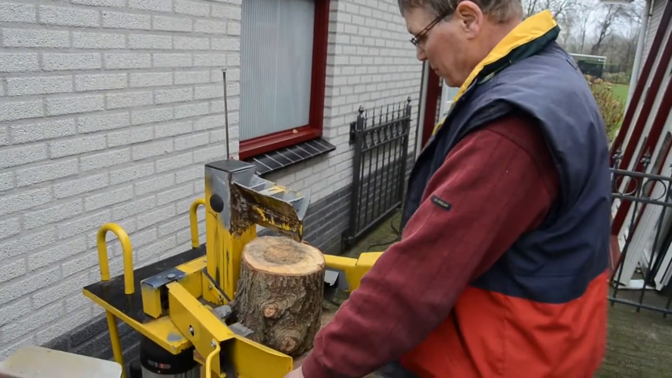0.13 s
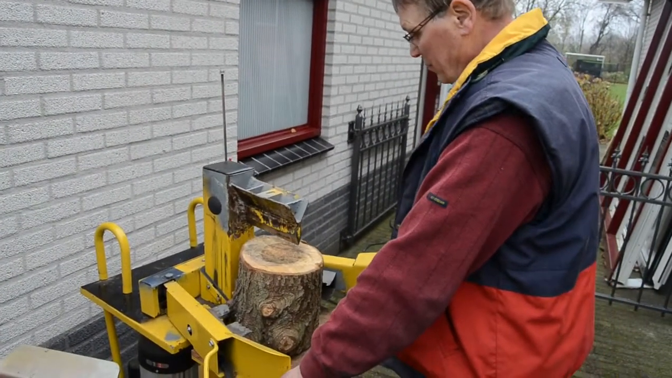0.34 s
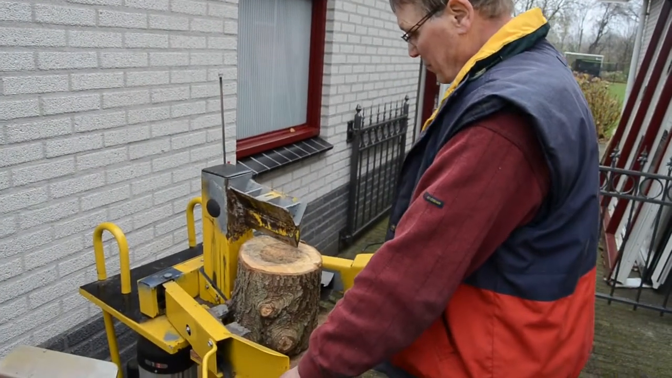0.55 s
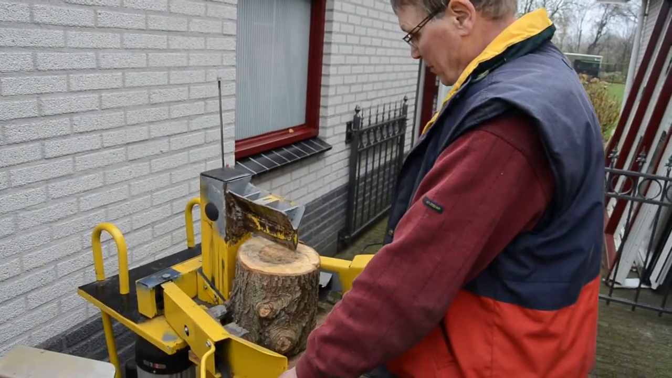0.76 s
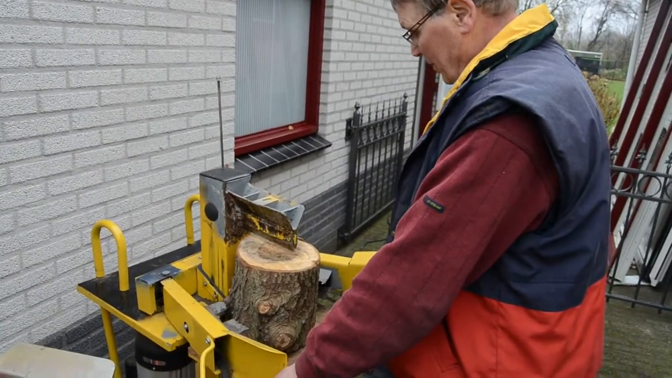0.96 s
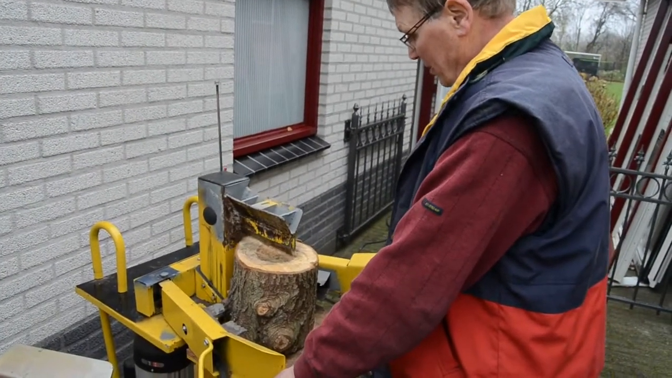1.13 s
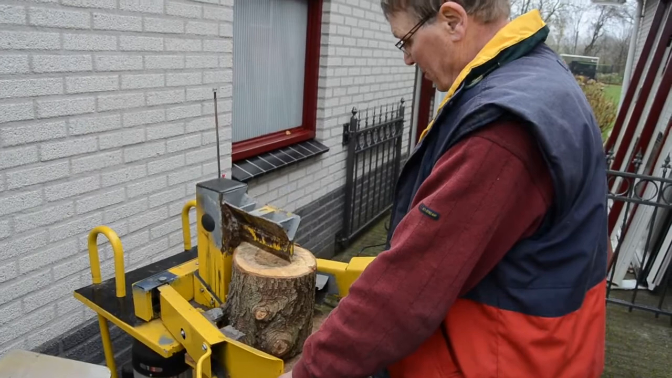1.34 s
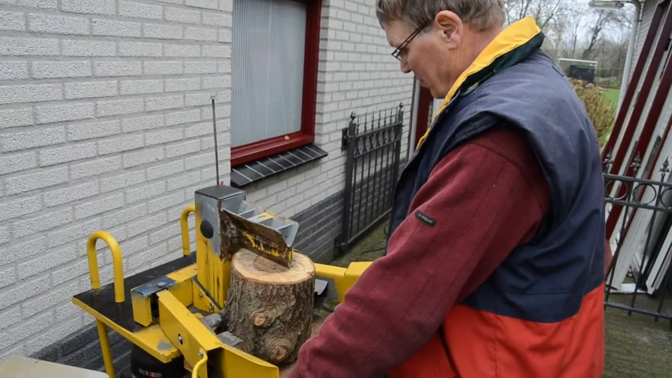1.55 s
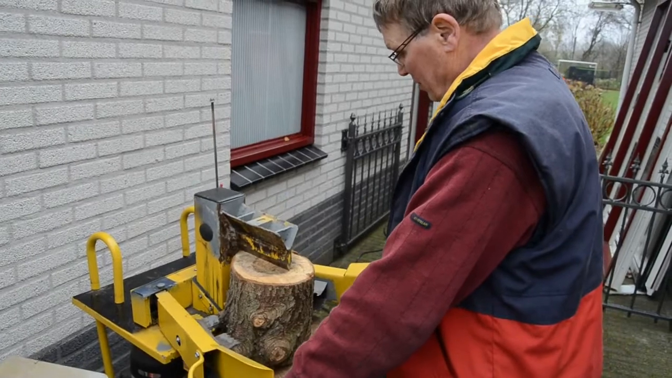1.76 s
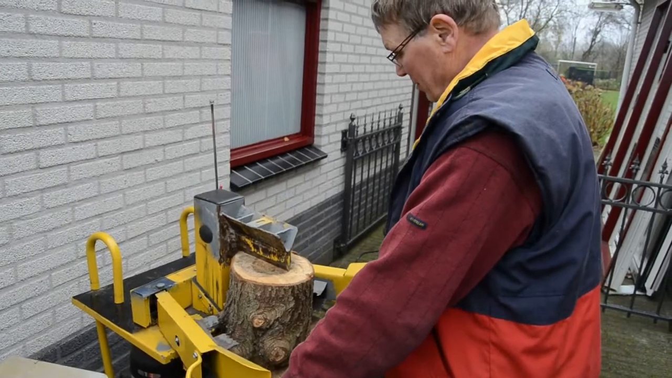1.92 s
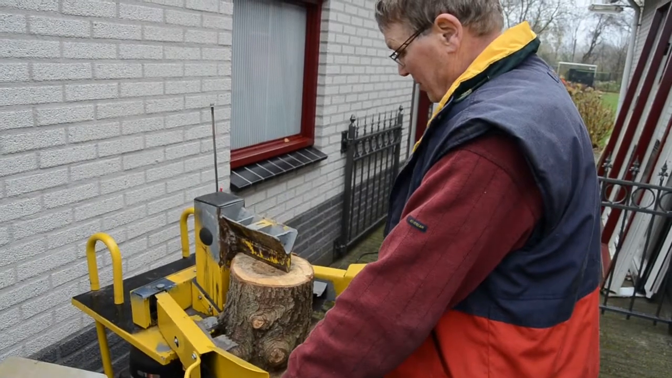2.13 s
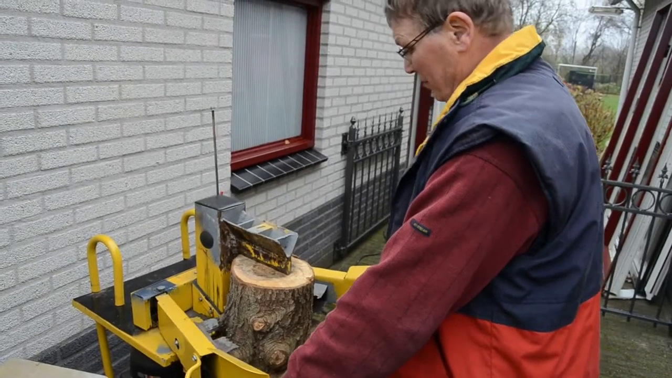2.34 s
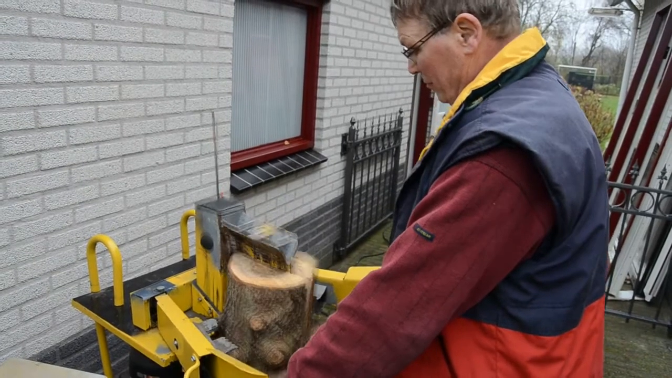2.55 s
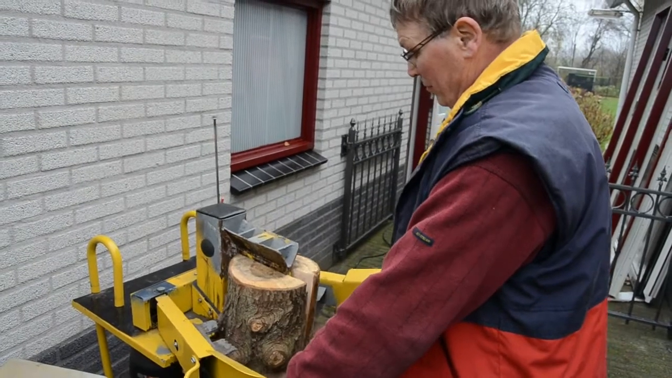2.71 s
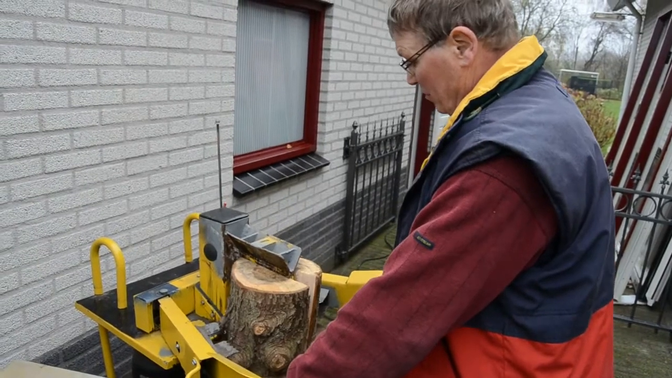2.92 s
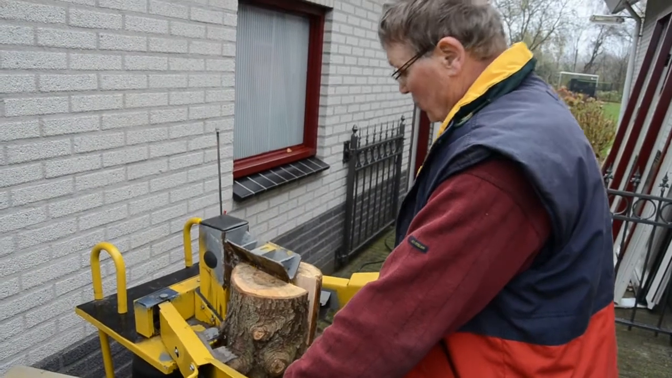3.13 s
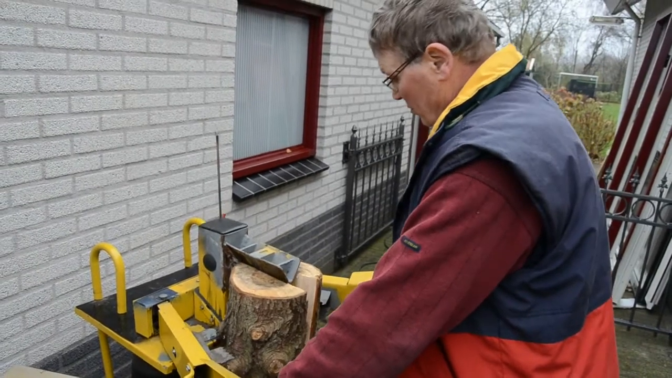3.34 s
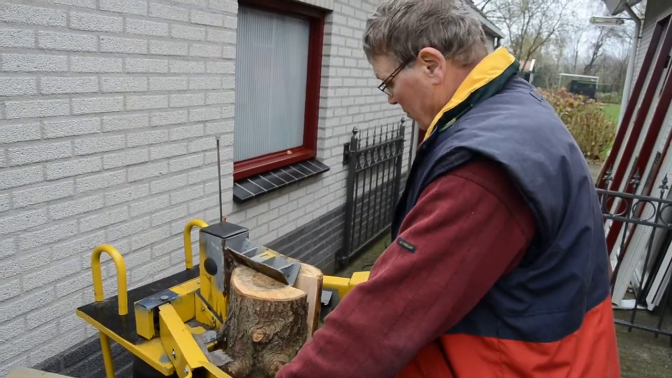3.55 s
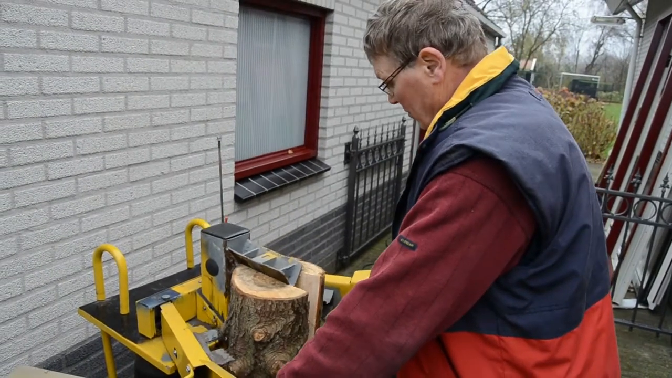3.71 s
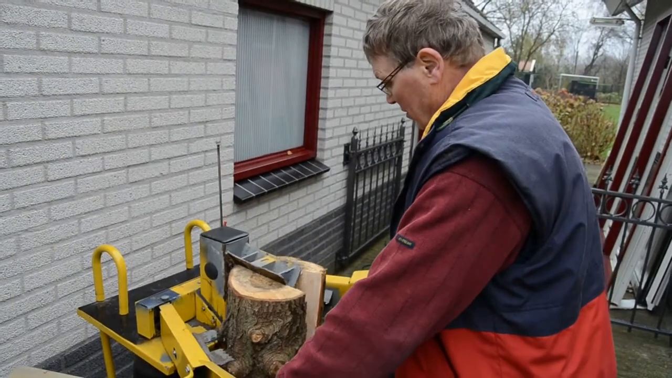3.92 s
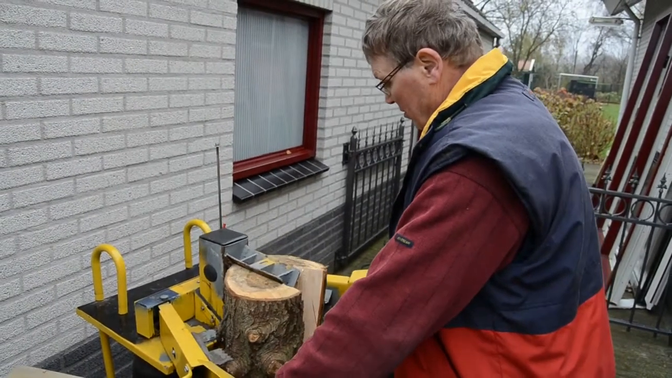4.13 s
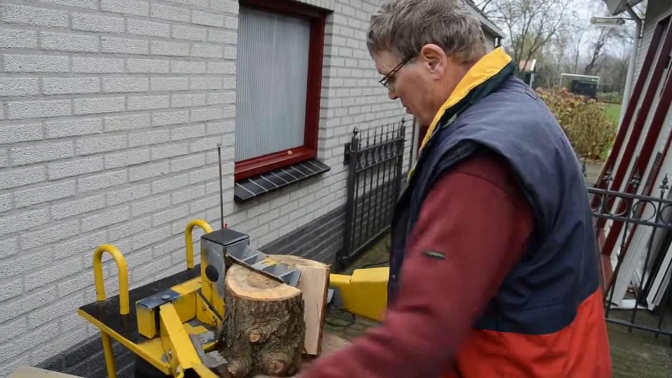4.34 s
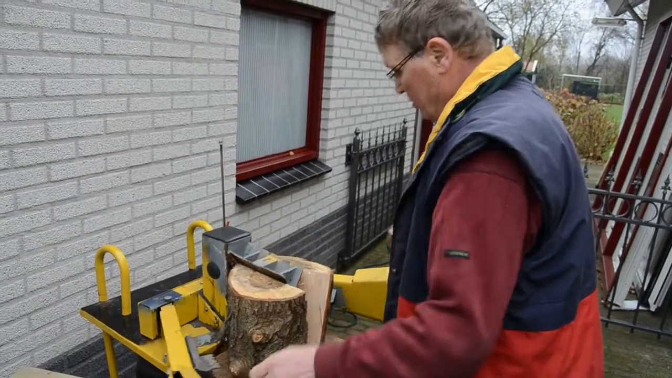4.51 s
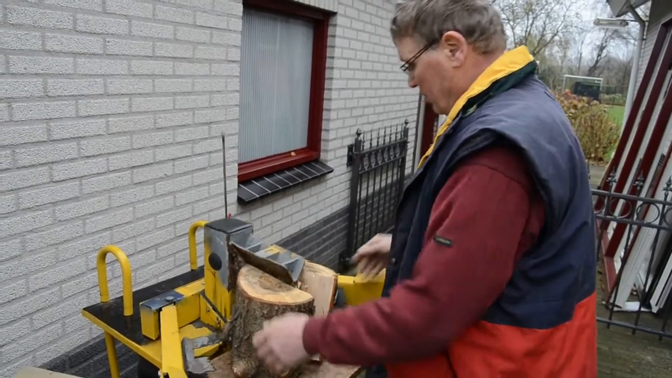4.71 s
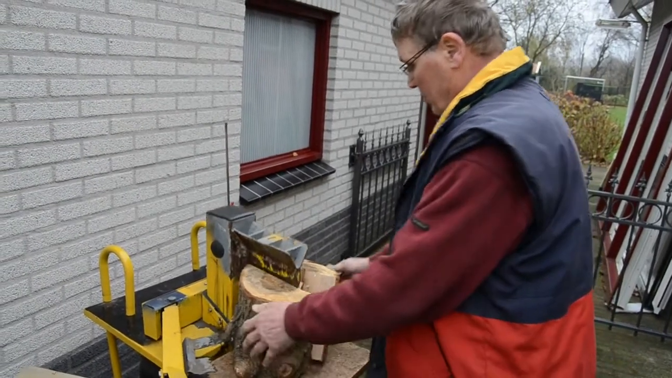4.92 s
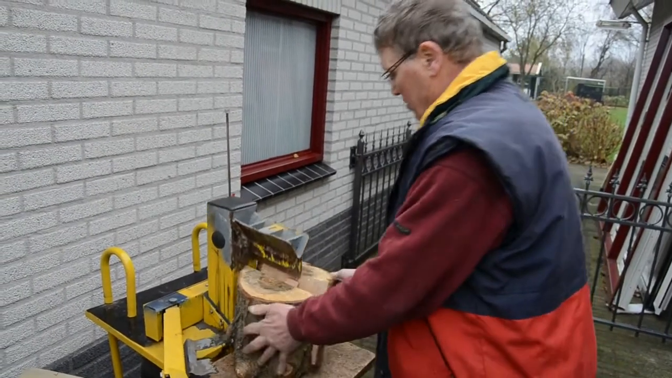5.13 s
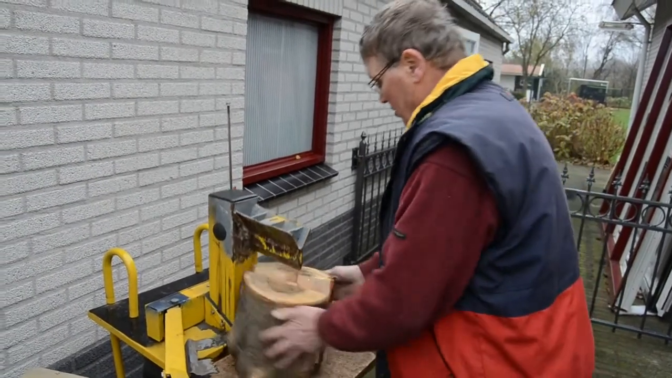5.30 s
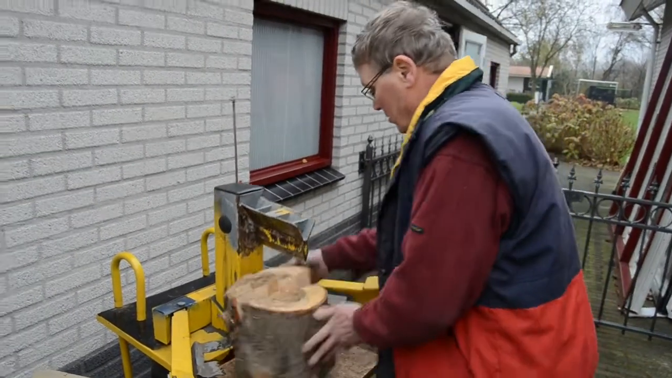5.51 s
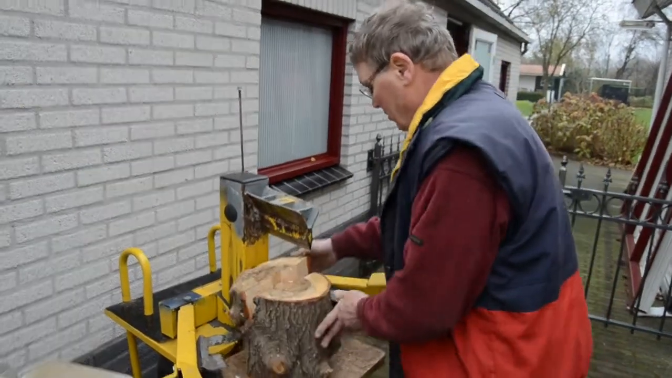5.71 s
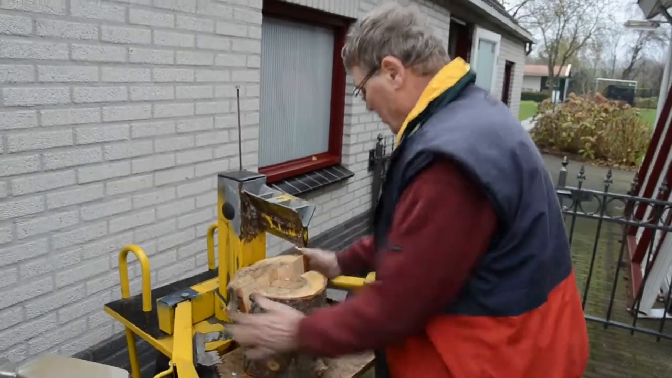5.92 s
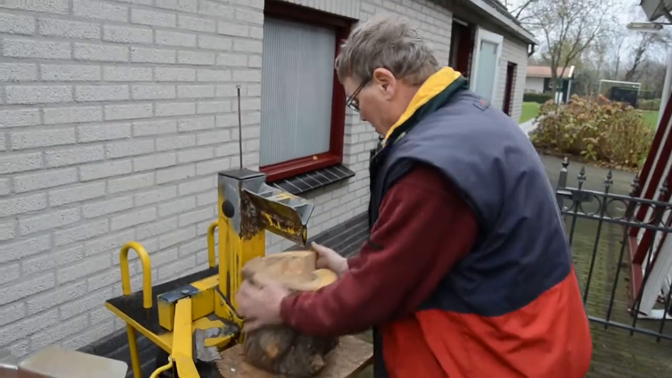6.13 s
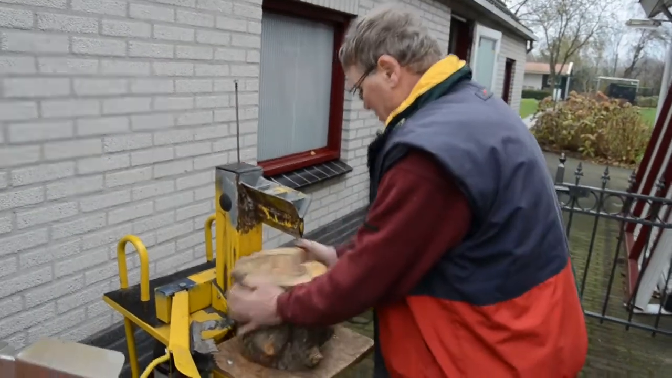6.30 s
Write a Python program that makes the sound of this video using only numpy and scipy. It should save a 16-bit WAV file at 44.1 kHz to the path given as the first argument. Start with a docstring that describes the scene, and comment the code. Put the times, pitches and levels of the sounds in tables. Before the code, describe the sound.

Outdoors beside a brick wall, an electric log splitter drones steadily from the start: buzzy gear whine, motor hum and rushing, spurting oil, close to the microphone. Around 1.35-1.5 s the wedge meets the log with faint dull knocks and a small crack. The whine sags in pitch as the pump loads; at about 1.8 s comes a brief hoarse high squeak, then gritty rubbing that grows. Sharp snaps at 2.35 s precede a huge splintering burst at 2.53 s, with a low thump and ringing wood and steel. The pump springs back up. From 2.95 to 4.2 s fibres snap and crack irregularly, with a strong snap near 3.93 s, then a second loud crack at 4.27 s. The pump strains lower again until about 5.65 s, then recovers. Dull bumps hit the steel table, strongest near 5.57 s, with small ones around 6.2 s. Blows echo faintly off the wall and yard.

```python
"""An electric log splitter drones and whines, its pitch dropping as the wedge loads the pump.
The drone is gear and bearing tones on multiples of the shaft rate, with motor hum and spurting oil noise.
The wedge knocks, rubs and squeaks; the log bursts in noise and ringing modes, its fibres snap in short noise bands.
Late on, the pump strains again and dull bumps sound on the steel table. A brick wall and yard echo the blows;
the close microphone rounds off the loudest peaks."""
import sys
import numpy as np
from scipy import signal
from scipy.fft import rfft, irfft, next_fast_len
from scipy.io import wavfile
from scipy.ndimage import map_coordinates

SR = 44100
rng = np.random.default_rng(int(sys.argv[2]) if len(sys.argv) > 2 else 0)


def unload_wav(signal):
    """Save mono or channel-first audio to the path in sys.argv[1] as 16-bit WAV at rate SR, clipped to [-1, 1]."""
    wavfile.write(
        sys.argv[1],
        SR,
        np.round(np.clip(np.atleast_2d(signal).T, -1, 1) * 32767).astype(np.int16),
    )


N = 280476
IDLE_HZ = 49.785  # shaft turns per second with no load


def amp(db):
    """Decibels to gain."""
    return 10 ** (np.asarray(db) / 20)


def unit(x):
    """Scale to rms 1."""
    return x / np.sqrt(np.mean(x ** 2) + 1e-20)


def along(points, hz):
    """Read (Hz, value) points on a log frequency axis."""
    point_hz, values = np.transpose(points)
    return np.interp(np.log(hz + 1), np.log(point_hz + 1), values)


def wobble(rate_hz):
    """A smooth random curve with rate_hz knots a second."""
    knots = rng.standard_normal(int(N * rate_hz / SR) + 4)
    coarse = np.arange(0, N + 64, 64)
    return np.interp(np.arange(N), coarse, map_coordinates(knots, [coarse * rate_hz / SR]))


def noise(colour, size=N, tilt_db=0):
    """Noise of rms 1 with a given spectrum, tilted per octave about 1 kHz."""
    padded = next_fast_len(size)
    hz = np.fft.rfftfreq(padded, 1 / SR)
    octaves = np.log2(np.maximum(hz, 150) / 1000)
    gain = amp(along(colour, hz) + tilt_db * octaves)
    return unit(irfft(rfft(rng.standard_normal(padded)) * gain)[:size])


def add(track, start_s, sound):
    """Mix a sound into the track at start_s."""
    start = round(start_s * SR)
    track[start:start + len(sound)] += sound[:max(N - start, 0)]


def gate(start_s, end_s, attack_s, release_s):
    """Linear attack, hold and exponential release."""
    t = np.arange(N) / SR
    rise = np.clip((t - start_s) / attack_s, 0, 1)
    return rise * np.exp(-np.maximum(t - end_s, 0) / release_s)


def machine(idle_db=-6, loaded_db=-6, tooth_db=-1.0, shaft_db=0.6, pump_db=-0.2, waver_db=0.7):
    """The motor hums and turns the pump; oil rushes in spurts, tooth by tooth."""
    # Pump effort. Each row: slip in turns per second, share (0 idling, 0.5 pressing, 1 full pressure).
    strain = [(0, 0.021), (.08, .14), (.25, .48), (1.45, 0.36), (1.95, 0.92)]
    # Oil and fan noise, idling. Each row: frequency in Hz, relative level in dB.
    idle_rush = [(25, -36), (60, -19), (110, -8), (250, -7.5), (450, -4), (950, -1), (1400, 3.5),
                 (2400, -2.5), (2950, 0), (3450, -8), (4100, -1), (5800, -12.5), (8400, -5.5), (11000, -31),
                 (15500, -39)]
    # Oil noise under pressure. Each row: frequency in Hz, relative level in dB.
    load_rush = [(25, -34), (60, -36), (110, -11), (280, -12), (460, -1), (850, -2), (1400, -0.5),
                 (2200, -7.5), (2900, -4), (4000, -10.5), (5800, -15.5), (8600, -12), (11500, -25.5),
                 (15500, -47)]
    # Oil rush level. Each row: share of full pressure, level in dB before the mix gains.
    rush_by_load = [(0, -23.5), (.45, -25), (1, -22.5)]
    # Motor hum. Each row: frequency in Hz, rms level in dB.
    hum_tones = [(102.3, -68), (118.4, -51.5)]
    slip_hz = motor_slip()
    load = np.clip(np.interp(slip_hz, *np.transpose(strain)), 0, 1)
    turns = np.cumsum(IDLE_HZ - slip_hz + .015 * wobble(13)) / SR

    teeth = 9
    spurts_db = tooth_db * np.sin(2 * np.pi * teeth * turns)
    spurts_db += shaft_db * np.sin(2 * np.pi * 2 * turns)
    oil = amp(idle_db) * np.sqrt(1 - load) * noise(idle_rush)
    oil += amp(loaded_db) * np.sqrt(load) * noise(load_rush)
    rush_db = np.interp(load, *np.transpose(rush_by_load)) + waver_db * wobble(4)

    t = np.arange(N) / SR
    hum = np.sqrt(2) * sum(amp(db) * np.sin(2 * np.pi * hz * t + .2 * wobble(5.3)) for hz, db in hum_tones)
    return amp(pump_db) * pump(turns, load) + amp(rush_db + spurts_db) * oil + hum


def motor_slip(build_power=1.7, relief_s=.035):
    """Each push builds pressure along an S-curve and lets it fall fast; the motor slows in proportion."""
    # Ram meeting resistance. Each row: start in s, end in s, full slip in turns per second, rise in s.
    pushes = [(0.6, 1.47, 0.02, 0.4), (1.384, 2.53, 2.678, 0.8), (2.695, 3.299, 0.073, 0.144),
              (3.256, 3.946, 0.415, 0.36), (3.931, 4.188, 0.225, 0.086), (4.241, 5.649, 1.97, 0.302)]
    t, slip_hz = np.arange(N) / SR, np.zeros(N)
    for start_s, end_s, full_hz, rise_s in pushes:
        pushed_s = np.clip(t - start_s, 0, end_s - start_s)
        built = 1 - np.exp(-(pushed_s / rise_s) ** build_power)
        slip_hz += full_hz * built * np.exp(-np.maximum(t - end_s, 0) / relief_s)
    return slip_hz


def pump(turns, load, drift_db=0.5, bearing_db=2.5, scatter_db=6.0):
    """Gears sound on shaft orders, bearings between them; oil pressure shifts their balance."""
    # Pump and motor tones; multiples of 9 are the gear teeth.
    # Each row: multiple of the shaft rate, relative level in dB idling, pressing, at full pressure.
    gear_orders = [(9, -41, -32, -25.5), (12, -49, -45, -62), (16, -48, -49, -34), (17, -60, -45, -40),
                   (18, -35.5, -31, -41), (19, -45, -53, -45), (20, -37, -43, -43), (22, -48, -50, -43),
                   (23, -49, -41, -50), (25, -45, -44, -49), (26, -59, -44, -44), (27, -28, -37, -32),
                   (29, -39, -47, -50), (34, -40, -48, -48), (35, -48, -52, -47), (36, -35, -45, -33),
                   (40, -45, -51, -62), (41, -40, -54, -55), (43, -45, -45, -40), (45, -40, -33, -35),
                   (52, -45, -42, -49), (54, -36, -35, -32), (56, -48, -45, -48), (57, -50, -52, -39),
                   (59, -52, -50, -40), (60, -46, -51, -62), (61, -48, -39, -38), (63, -44, -35, -38),
                   (65, -52, -44, -40), (70, -51, -50, -56), (72, -50, -50, -52), (76, -47, -50, -63),
                   (78, -50, -48, -63), (79, -45, -39, -51), (80, -48, -43, -56), (81, -57, -40, -50),
                   (83, -48, -47, -50), (86, -55, -56, -63), (87, -56, -45, -63), (90, -47, -51, -43),
                   (99, -39.5, -50, -60), (135, -50, -55, -57), (136, -58, -53, -50), (151, -51, -63, -55),
                   (152, -63, -59, -49), (165, -50, -60, -63), (171, -48, -52, -58), (180, -58, -51, -51),
                   (188, -55, -52, -44), (197, -59, -61, -50), (207, -56, -61, -63), (216, -63, -63, -57),
                   (217, -66, -62, -57), (288, -80, -75, -68)]
    # Bearing tones. Each row: multiple of the shaft rate, relative level in dB idling, pressing, at full.
    bearing_orders = [(7.19, -51, -54, -64), (10.79, -44, -44, -46), (14.38, -40, -41, -52),
                      (16.39, -42, -45, -58), (21.57, -39, -43, -50), (25.16, -45, -44, -49)]
    # Weaker shaft orders. Each row: frequency in Hz, relative level in dB idling, at full pressure.
    weak_orders = [(50.5, -61.5, -59), (247, -58.5, -68), (393, -49.5, -48.5), (1230, -58, -52),
                   (2160, -52, -51), (2870, -59, -48), (4100, -53, -56), (5970, -59.5, -60.5),
                   (7600, -57.5, -62), (9100, -56.5, -60), (10000, -61, -67), (10400, -63.5, -64),
                   (11160, -68, -67.5), (15100, -84, -81)]

    def tone(order, levels_db):
        """One order, its level following the load."""
        size = np.interp(load, [0, .5, 1], amp(levels_db)) * amp(drift_db * wobble(2.33) + wobble(20))
        return size * np.sin(2 * np.pi * (order * turns + rng.random()) + .07 * wobble(30))

    gears = sum(tone(order, levels_db) for order, *levels_db in gear_orders)
    bearings = sum(tone(order, levels_db) for order, *levels_db in bearing_orders)
    idling = buzz(turns, [(hz, db) for hz, db, _ in weak_orders], scatter_db)
    straining = buzz(turns, [(hz, db) for hz, _, db in weak_orders], scatter_db)
    weak = np.sqrt(1 - load) * idling + np.sqrt(load) * straining
    return np.sqrt(2) * (gears + amp(bearing_db) * bearings + weak)


def buzz(turns, spectrum, scatter_db):
    """Small differences between the teeth repeat once a turn, giving uneven lines on every shaft order."""
    orders = np.arange(320)
    scatter = unit(amp(scatter_db * np.clip(rng.standard_normal(len(orders)), -2, 2)))
    sizes = scatter * amp(along(spectrum, orders * IDLE_HZ))
    lines = sizes * np.exp(2j * np.pi * rng.random(len(orders))) * (orders > 0)
    one_turn = irfft(lines, 4096, norm="forward") / 2
    return np.interp(turns % 1, np.linspace(0, 1, len(one_turn), endpoint=False), one_turn)


def wedge(grain_db=1.5, judder_db=1, flutter_db=2, fundamental_db=-13):
    """The blade sticks and slips in the wood: a gritty rub that grows, and a chirp in a hoarse, sagging squeak."""
    # Wedge rubbing in the wood. Each row: start in s, end in s, level at the start in dB.
    rubs = [(1.757, 2.564, -34), (2.953, 3.33, -48), (3.932, 4.08, -41)]
    # Rub spectrum. Each row: frequency in Hz, relative level in dB.
    rub_colour = [(300, -24), (1500, -3), (3000, -3), (4600, -1), (5500, -3), (6400, -1), (8000, -4),
                  (9500, -1.5), (12000, -14.5), (16000, -36)]
    # Squeak overtones. Each row: multiple of the fundamental, relative level in dB.
    squeak_partials = [(2, -5), (3, 0)]
    rub_attack_s, rub_release_s, rub_grows_db_per_s = 0.031, .07, 9
    squeak_s, squeak_end_s, squeak_attack_s, squeak_release_s = 1.75, 2, .04, .06
    squeak_hz, sag_hz_per_s2, squeak_db = 3230, 4000, -30
    chirp_s, chirp_width_s, chirp_db = 1.8, 0.018, -24
    t = np.arange(N) / SR

    grip = np.zeros(N)
    for start_s, end_s, db in rubs:
        level_db = db + rub_grows_db_per_s * np.clip(t - start_s, 0, end_s - start_s)
        grip += amp(level_db) * gate(start_s, end_s, rub_attack_s, rub_release_s)
    rub = grip * unit(noise(rub_colour) * amp(grain_db * wobble(500) + judder_db * wobble(35.9)))

    hz = squeak_hz - sag_hz_per_s2 * np.clip(t - squeak_s, 0, .5) ** 2
    phase = 2 * np.pi * np.cumsum(hz * (1 + .032 * wobble(600))) / SR
    hoarse = amp(fundamental_db) * np.sin(phase)
    hoarse += sum(amp(db) * np.sin(k * phase) for k, db in squeak_partials)
    chirp = amp(chirp_db) * np.exp(-((t - chirp_s) / chirp_width_s) ** 2) * np.sin(phase)
    squeak_gate = gate(squeak_s, squeak_end_s, squeak_attack_s, squeak_release_s)
    squeak = chirp + amp(squeak_db) * squeak_gate * hoarse
    return rub + amp(flutter_db * wobble(59.9)) * squeak


def blows(rows, colour, damping, splinter_db):
    """Blows: dense, splintery wood noise that dies band by band, and the ring of log and frame."""
    # Wood decay. Each row: frequency in Hz, t60 in s before the damping factor.
    wood_t60 = [(60, 0.36), (110, 0.52), (250, 0.46), (600, 0.34), (1500, 0.31), (4000, .2), (12000, 0.1)]
    # Log and wedge modes. Each row: frequency in Hz, relative level in dB, t60 in s.
    log_modes = [(585, -13, 0.46), (760, -11, 0.2), (1966, -11, 0.18), (3550, -17, 0.14),
                 (6505, -12, 0.093), (8900, -15, .11)]
    # Steel frame modes. Each row: frequency in Hz, relative level in dB, t60 in s.
    frame_modes = [(107.7, -23, 0.71), (395, -17, 0.55), (630.5, -21.5, 0.5), (1473, -13, 0.11),
                   (1820, -20, 0.15), (2300, -41, 0.21)]
    out, t = np.zeros(N), np.arange(SR) / SR
    for start_s, db, tilt_db, log_db, frame_db in rows:
        splinters = unit(noise(colour, size=SR, tilt_db=tilt_db) * amp(splinter_db * wobble(152)[:SR]))
        hz, times, z = signal.stft(splinters, SR, nperseg=256)
        decay = amp(-60 * damping * times / along(wood_t60, hz)[:, None])
        wood = signal.istft(z * decay, SR)[1][:SR]
        rings = amp(log_db) * ring(log_modes, t) + amp(frame_db) * ring(frame_modes, t)
        add(out, start_s, amp(db) * (wood + rings))
    return out


def ring(modes, t, attack_s=0.00096):
    """Decaying modes, struck with new strengths and phases each time."""
    total = np.zeros(len(t))
    for hz, db, t60_s in modes:
        fade = amp(db + rng.normal(0, 0.61) - 60 * t / t60_s)
        total += fade * np.sin(2 * np.pi * (hz * t + rng.random()))
    return (1 - np.exp(-t / attack_s)) * total


def recoil(start_s=2.5275, hz=320, db=15, t60_s=0.035, low_hz=115, low_db=-5, low_t60_s=0.1):
    """The ram lurches as the log first gives way: one short low thump of two modes."""
    out, t = np.zeros(N), np.arange(SR // 5) / SR
    add(out, start_s, ring([(hz, db, t60_s), (low_hz, low_db, low_t60_s)], t))
    return out


def fibres(snap_db=-5.5, crack_db=-7, knock_db=-10, snap_t60_s=0.018, crack_t60_s=0.031,
           knock_t60_s=0.075, tail_db=-19, tail_t60_s=0.21):
    """Each parting fibre snaps brightly, cracks along the grain and knocks the log; a smaller one follows."""
    # Fibres parting. Each row: start in s, overall level in dB, crack and knock offsets in dB.
    snaps = [(1.483, -14, 13, -14), (2.3408, -9.5, 9.5, -19), (2.3462, -5, 0, -24), (2.488, -17.5, 9, 10),
             (2.5196, -7, 5, -24), (2.9606, -11, 2, -14), (3.1414, -5.5, -3.5, -21), (3.2051, -15, 0, -28),
             (3.2256, -1.5, -7.5, -19), (3.2772, -14, 1, -13), (3.2985, -2, -5, -11.5),
             (3.5825, -7.5, 0, -5), (3.6453, -6.5, -2, -1), (3.6782, -9.5, 0, 1), (3.702, -13.5, 0, 1),
             (3.7411, -8.5, -2.5, 0.5), (3.935, 2.5, -6, -6), (3.9464, -6.5, 1, -1), (3.9836, -2, -3.5, -6),
             (4.0366, -7, -19, -5.5), (4.1238, -7.5, 3.5, -2), (4.1863, -5.5, -3.5, -5)]
    # Spectra of snap, crack and knock. Each row: frequency in Hz, relative level in dB.
    snap_colour = [(2500, -39), (4800, 6.5), (5700, 3.5), (6600, 3.5), (9000, 4), (11500, -10),
                   (16000, -46)]
    crack_colour = [(700, -24), (1500, 4), (2500, 4.5), (4000, 0), (6000, -35)]
    knock_colour = [(100, -37), (400, -16), (590, 14.5), (780, -1.5), (1200, 4.5), (2500, -31)]
    follow_delay_s, follow_db, follow_scatter_db = (.004, .025), -18.5, 2
    out, t = np.zeros(N), np.arange(SR // 5) / SR
    followers = []
    for start_s, *_ in snaps:
        level_db = follow_db + follow_scatter_db * rng.standard_normal()
        followers.append((start_s + rng.uniform(*follow_delay_s), level_db, 0, 0))
    for start_s, db, crack, knock in snaps + followers:
        parts = [(snap_colour, snap_db, snap_t60_s),
                 (crack_colour, crack_db + crack, crack_t60_s),
                 (knock_colour, knock_db + knock, knock_t60_s)]
        for colour, part_db, t60_s in parts:
            fade = amp(-60 * t / t60_s) + amp(tail_db - 60 * t / tail_t60_s)
            add(out, start_s, amp(db + part_db) * fade * noise(colour, size=len(t)))
    return out


def wall(x, delay_s=.0042, echo_db=-10):
    """The brick wall returns one early reflection."""
    return x + amp(echo_db) * np.pad(x, (round(delay_s * SR), 0))[:N]


def yard(x, echo_db=-19):
    """House and fences add a faint diffuse echo that dies band by band."""
    # Echo decay. Each row: frequency in Hz, t60 in s.
    yard_t60 = [(100, .6), (400, 0.55), (3000, 0.73), (8000, 0.57), (14000, 0.46)]
    hz, times, z = signal.stft(rng.standard_normal(SR), SR, nperseg=256)
    tail = signal.istft(z * amp(-60 * times / along(yard_t60, hz)[:, None]), SR)[1]
    return x + amp(echo_db) * signal.fftconvolve(x, tail / np.linalg.norm(tail))[:N]


def scene():
    """Machine, wedge and wood, heard from beside the table."""
    # Log bursting and jolting the frame.
    # Each row: start in s, level in dB, tilt in dB per octave, log ring in dB, frame ring in dB (relative).
    burst_rows = [(2.528, 8.5, 1.5, -6, -11), (2.546, 7.5, 0.5, 1, 0), (2.571, 4.5, -2.5, -5, 3),
                  (2.598, -3.5, 0, -6, -3), (2.69, -25.5, -3, -4, 16.5), (4.2725, 2.5, 2.5, 2, -16),
                  (4.297, -5, -1, 2.5, -5), (4.383, -18.5, -2.5, 1, 1)]
    # Burst spectrum. Each row: frequency in Hz, relative level in dB.
    burst_colour = [(25, -30), (70, -36), (120, -12), (220, -19), (350, -4), (600, -0.5), (1400, 1.5),
                    (2500, -0.5), (4500, -5), (8500, -9), (12000, -17), (16000, -39)]
    # Dull scuffs and knocks: the wedge touching the log, small knocks just before cracks,
    # later bumps on the table.
    # Each row: start in s, level in dB, tilt in dB per octave, relative frame ring in dB.
    knock_rows = [(1.345, -31, -3, -6), (1.411, -28.5, -3, -4), (3.927, -22, -2.5, -3),
                  (4.261, -18, 2.5, -6), (5.15, -35, -7.5, -3), (5.43, -29.5, -5, -7.5), (5.543, -25, 1, 0),
                  (5.571, -10.5, 0.5, 1.5), (5.643, -19.5, 5, -2), (5.68, -29.5, -6, -1),
                  (6.21, -21.5, 0, -6), (6.268, -29.5, -1.5, -5)]
    # Scuff and knock spectrum. Each row: frequency in Hz, relative level in dB.
    dull_colour = [(30, -38), (80, -12), (200, -7.5), (480, 6.5), (1000, -1.5), (1900, 4), (3000, -3.5),
                   (5000, -11.5), (9000, -21), (16000, -46)]
    dull_log_db = -11.5  # relative ring of the log in each scuff or knock
    bursts = blows(burst_rows, burst_colour, damping=1.12, splinter_db=1.5) + recoil()
    dull_rows = [(start_s, db, tilt_db, dull_log_db, frame_db) for start_s, db, tilt_db, frame_db in knock_rows]
    knocks = blows(dull_rows, dull_colour, damping=1.08, splinter_db=1.5)
    return (machine() + wedge() + yard(wall(fibres() + bursts + knocks)))[None]


def record(dry, ceiling=1.0, hardness=7, top_hz=15750):
    """The microphone colours the sound, its amplifier clips with a rounded knee, and the band ends steeply."""
    # Microphone response. Each row: frequency in Hz, gain in dB.
    mic = [(20, -5), (5200, -2), (5750, -9), (6400, 0), (6950, -4.5), (7600, 0.5), (16000, -1)]
    size = next_fast_len(N + SR // 2)
    hz = np.fft.rfftfreq(size, 1 / SR)
    x = irfft(rfft(dry, size) * amp(along(mic, hz)), size)
    clipped = x / (1 + np.abs(x / ceiling) ** hardness) ** (1 / hardness)
    return irfft(rfft(clipped) * (hz < top_hz), size)[:, :N]


dry = scene()
out = record(dry)
unload_wav(out)
```